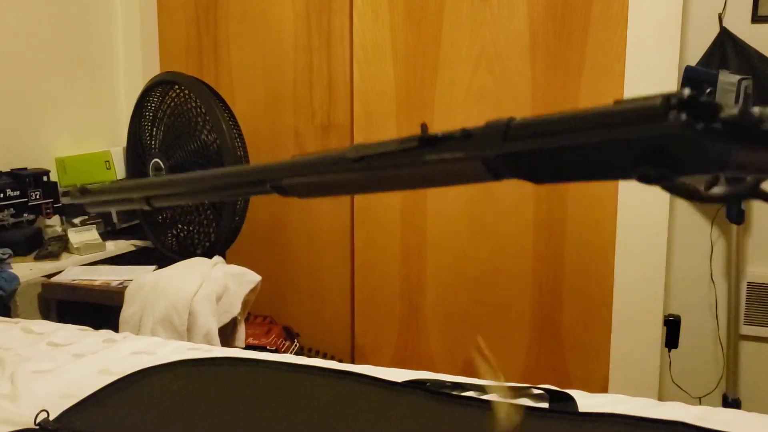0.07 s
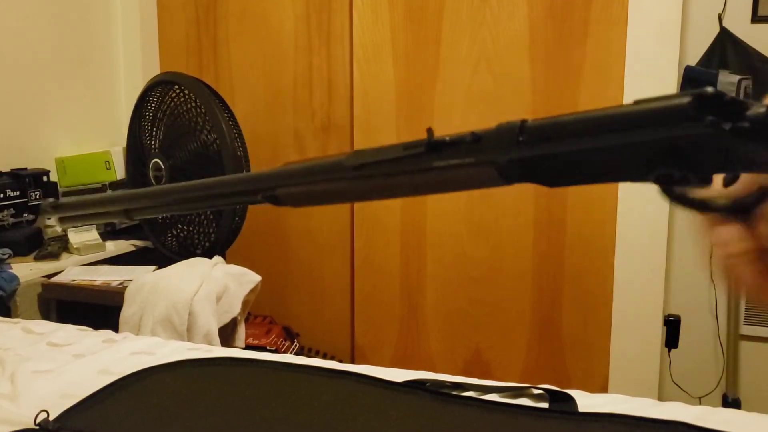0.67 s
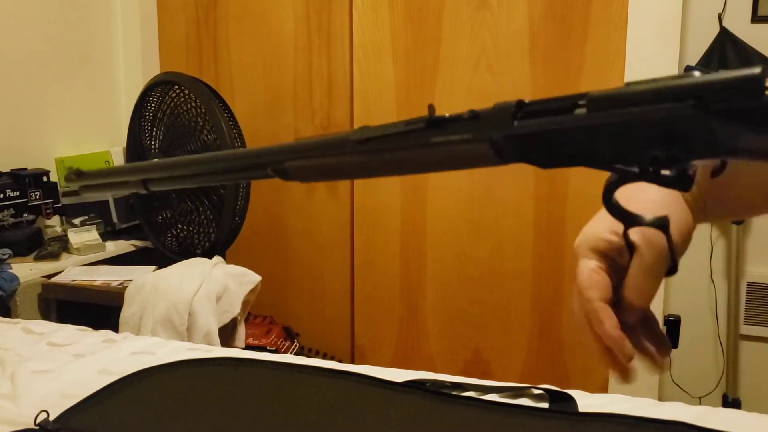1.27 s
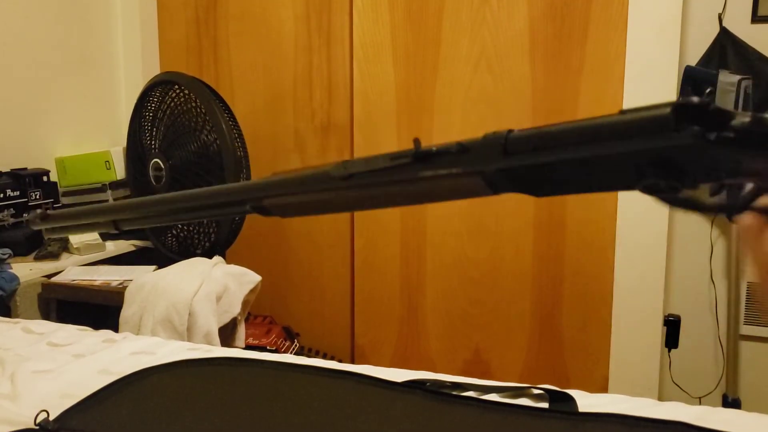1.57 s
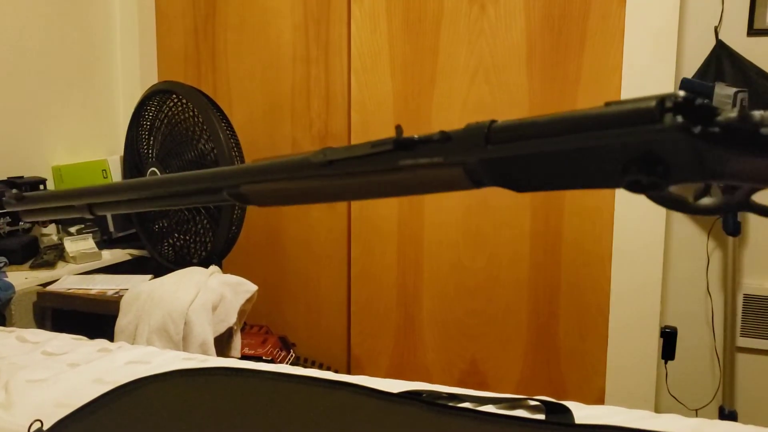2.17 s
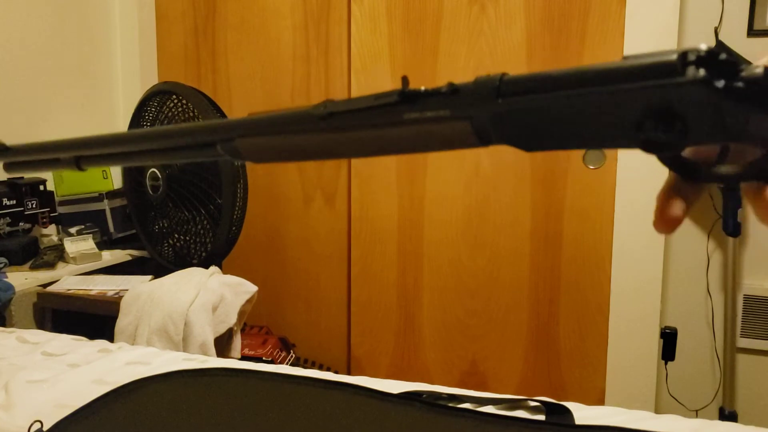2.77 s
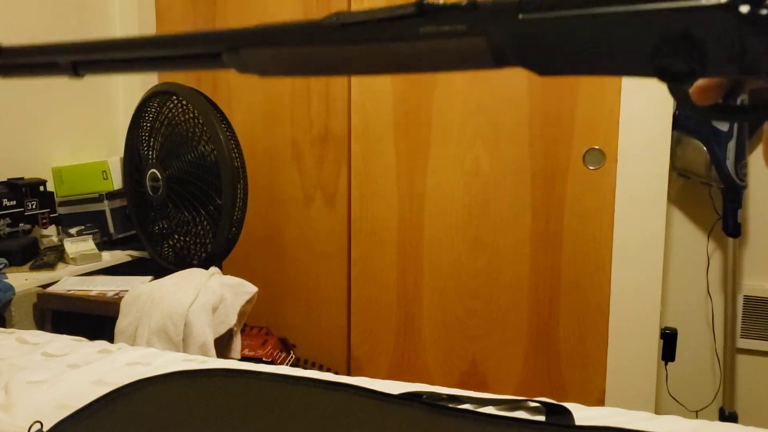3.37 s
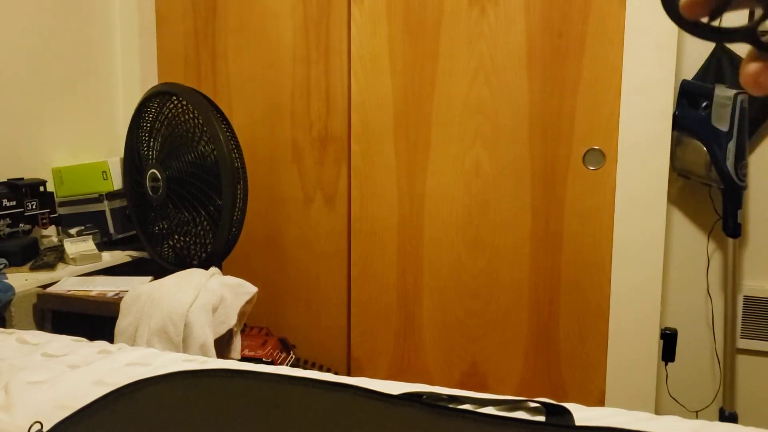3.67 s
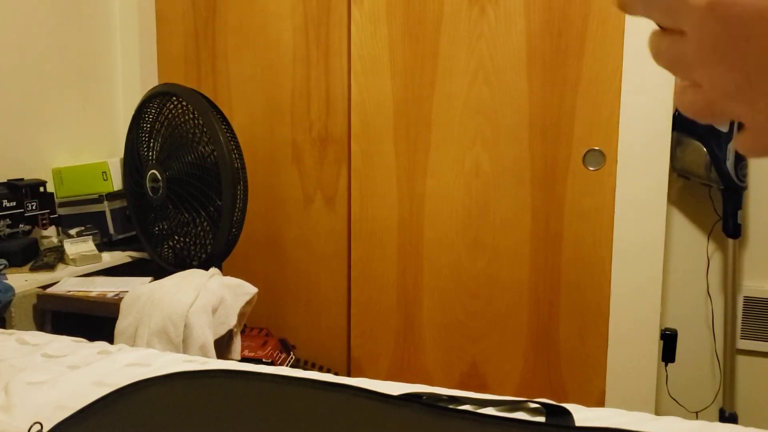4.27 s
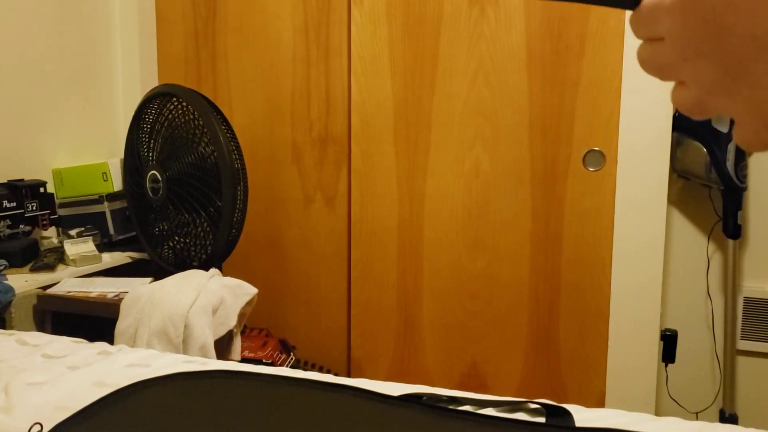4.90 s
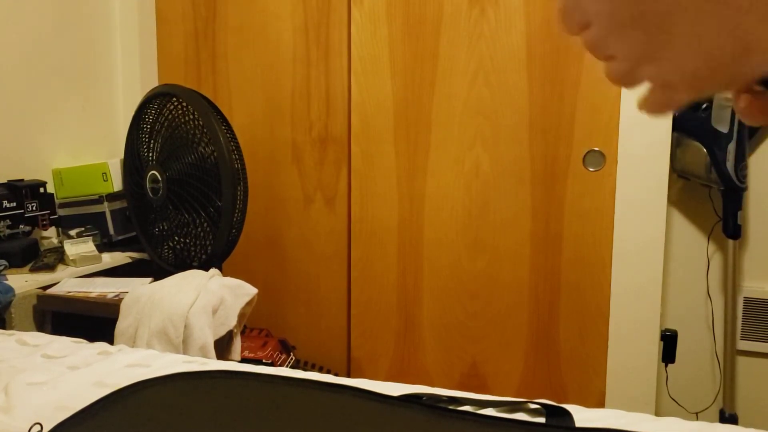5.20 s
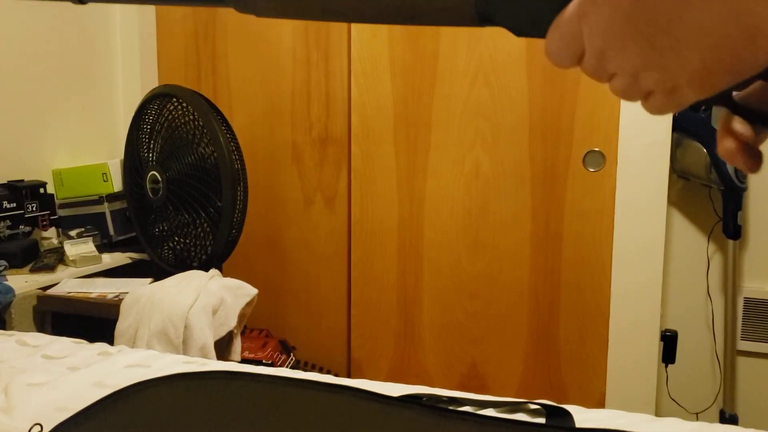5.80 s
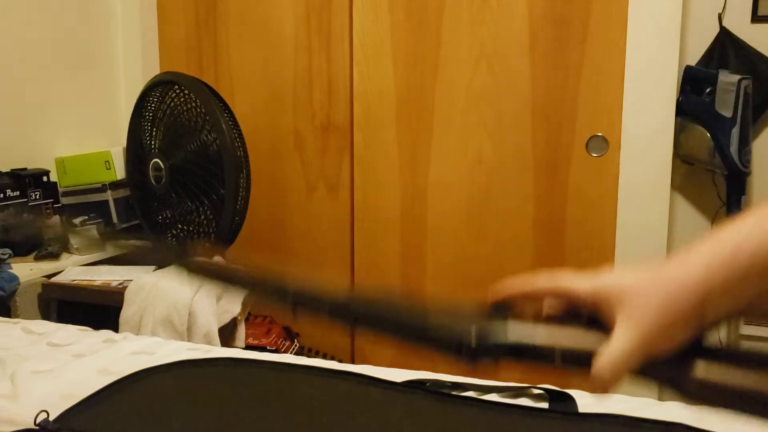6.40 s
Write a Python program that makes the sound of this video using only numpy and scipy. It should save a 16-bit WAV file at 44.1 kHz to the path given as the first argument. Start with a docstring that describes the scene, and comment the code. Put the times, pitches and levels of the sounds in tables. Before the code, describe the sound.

A toy lever-action rifle is cycled quickly with loud metallic clacks, then a few handling clicks, over a fan's steady rush.

```python
"""In a small bedroom, a toy lever-action rifle is cycled fast. Each stroke is a run of impacts that
crack, ring the steel parts and knock the receiver, with friction between them. Ejected shells thump
on the bedding. Later the hands shift and the action clicks a few times. A fan rushes and hums behind
it all, swelling as the camera's gain control recovers from the clacks."""
import sys
import numpy as np
from scipy import signal
from scipy.fft import rfft, irfft, next_fast_len
from scipy.io import wavfile
from scipy.ndimage import uniform_filter1d, minimum_filter1d, map_coordinates

SR = 44100
rng = np.random.default_rng(int(sys.argv[2]) if len(sys.argv) > 2 else 0)


def inscribe(sig):
    """Save sig as 16-bit PCM at rate SR to the path in sys.argv[1].

    A 1-D sig is mono; a 2-D sig holds one channel per row.
    Samples are clipped to [-1, 1] before scaling.
    """
    pcm = np.round(np.clip(np.atleast_2d(sig).T, -1, 1) * 32767)
    wavfile.write(sys.argv[1], SR, pcm.astype(np.int16))


N = 284445


def amp(db):
    """Decibels to gain."""
    return 10 ** (np.asarray(db) / 20)


def unit(x):
    """Scaled to rms 1."""
    return x / np.sqrt(np.mean(x ** 2) + 1e-20)


def along(points, hz):
    """Interpolation on a log frequency axis."""
    freqs, values = np.transpose(points)
    return np.interp(np.log(hz + 1), np.log(freqs + 1), values)


def wobble(rate):
    """A smooth random curve, rate knots a second."""
    return map_coordinates(rng.standard_normal(int(N * rate / SR) + 4), [np.arange(N) * rate / SR])


def filtered(x, response):
    """Linear filtering: the spectrum times a frequency response."""
    n = x.shape[-1]
    size = next_fast_len(2 * n)
    return irfft(rfft(x, size) * response(np.fft.rfftfreq(size, 1 / SR)), size)[..., :n]


def add(track, s, sound):
    """Superposition: a sound joins the track at s seconds."""
    start = max(0, round(s * SR))
    part = sound[..., :max(0, N - start)]
    track[..., start:start + part.shape[-1]] += part


def sides(pan_db):
    """Left and right gains for a level difference."""
    return unit(amp(np.array([[pan_db], [-pan_db]]) / 2))


# Each row: frequency in Hz, relative spectral density in dB.
AIR_SPECTRUM = [(15, -51.5), (25, -22.5), (48, -11), (114, -12.5), (190, -14), (249, -12), (384, -13.5),
                (427, -16), (531, -12), (754, -11), (911, -11.5), (2690, -14.5), (8830, -32),
                (14000, -29.5), (16000, -40.5)]
# Each row: frequency in Hz, correlation between the two microphones.
AIR_CORRELATION = [(60, 0.94), (150, 0.99), (380, 0.65), (950, 0.073), (2380, -0.1), (5980, 0.11),
                   (15000, -0.11)]
# Each row: frequency in Hz, level in dB, unsteadiness from 0 to 1.
FAN_TONES = [(60.7, -53, 0.7), (85.7, -51.5, 0.95), (96.6, -54.5, 1), (120.3, -47, 0.17),
             (167.8, -56.5, 0.49), (255.8, -56.5, 0.53), (427.4, -60, 0.45), (682, -59, 0.55),
             (764, -54, 0.55)]
# Each row: time in seconds, gain in dB. The fan comes up a little as the rifle is lifted away.
FAN_SWELL = [(0, -1.5), (2.95, -2), (3.3, 0.95), (6.45, -0.25)]

def fan():
    """Turbulence gives noise, coherent in the bass and diffuse above; motor and blades give tones."""
    def mid_and_side(hz):
        angle = np.arccos(np.clip(along(AIR_CORRELATION, hz), -1, 1)) / 2
        return amp(along(AIR_SPECTRUM, hz)) * [np.cos(angle), np.sin(angle)]

    mid, side = filtered(rng.standard_normal((2, N)), mid_and_side)
    air = amp(-39.5 + 0.79 * wobble(3.62)) * unit(np.array([mid + side, mid - side]))
    tones, t = np.zeros(N), np.arange(N) / SR
    for hz, db, shake in FAN_TONES:
        waver = 1 - shake + shake * (wobble(14) + 1j * wobble(14))
        tones += amp(db) * unit(np.real(waver * np.exp(2j * np.pi * hz * t)))
    return (air + tones) * sides(2.27) * amp(np.interp(t, *np.transpose(FAN_SWELL)))


# Each row: frequency in Hz, reverberation time T60 in seconds.
ROOM_DECAY = [(200, 0.4), (1300, 0.18), (3500, 0.27), (9000, 0.18), (15000, 0.17)]

def in_room(near, far, build_s=.0045, wall_s=0.011, wall_db=3.5):
    """Reverberation: direct sound is followed by a cluster of wall echoes and a diffuse tail."""
    hz, t, spectra = signal.stft(rng.standard_normal((2, SR // 3)), SR, nperseg=256)
    tail = signal.istft(spectra * amp(-60 * t / along(ROOM_DECAY, hz)[:, None]), SR, nperseg=256)[1]
    t = np.arange(tail.shape[1]) / SR
    tail *= 1 - np.exp(-(t / build_s) ** 2)
    tail *= amp(wall_db * np.exp(-((t - wall_s) / 0.0055) ** 2))
    heard = signal.fftconvolve(far, tail / np.linalg.norm(tail[0]), axes=1)
    heard[:, :near.shape[1]] += near
    return heard


def burst(t, attack, t60):
    """Impulsive excitation: decaying noise of energy 1, different at each microphone."""
    noise = rng.standard_normal((2, len(t))) * (1 - np.exp(-(t / attack) ** 2)) * amp(-60 * t / t60)
    return noise / np.linalg.norm(noise, axis=1, keepdims=True)


# Each row: frequency in Hz, relative level in dB, T60 in seconds.
STEEL_MODES = [(9750, -1, 0.025), (10830, -8.5, 0.033), (11400, -3, 0.033), (11840, -5, 0.053),
               (12700, -16, 0.031), (13100, -2, 0.043), (12940, -2.5, .04), (12900, -8.5, 0.035),
               (14600, -2.5, .04), (15100, -4, .03)]

def steel_ring(t):
    """Free vibration: small parts ring at random strengths, slightly off pitch as the linkage moves."""
    ring = np.zeros((2, len(t)))
    detunes = 1 + .003 * rng.standard_normal(len(STEEL_MODES))
    for (hz, db, t60), detune in zip(STEEL_MODES, detunes):
        envelope = amp(db + rng.normal(0, 2.5, (2, 1)) - 60 * t / t60)
        ring += envelope * np.sin(2 * np.pi * (hz * detune * t + rng.random((2, 1))))
    return ring


# Each row: centre frequency in Hz, bandwidth in Hz, gain in dB.
RECEIVER_MODES = [(747, 110, -3), (1396, 120, 3), (1530, 130, 2), (1705, 72, 1.5), (1822, 65, -0.5),
                  (2065, 137, -1), (2386, 170, -1), (3500, 1600, -7.5)]

def receiver(hz):
    """Resonance: the receiver responds as a sum of damped modes of alternating sign."""
    return sum((-1) ** k * amp(db) * 1j * hz * width / (centre ** 2 - hz ** 2 + 1j * hz * width)
               for k, (centre, width, db) in enumerate(RECEIVER_MODES))


# Each row: frequency in Hz, relative spectral density in dB.
METAL_SPECTRUM = [(1180, -22.5), (2000, -12), (3260, -12.5), (5440, -8), (6250, -7.5), (8850, -7.5),
                  (9330, -6), (10200, -7.5), (11300, 0.5), (12400, -2), (13600, 0), (15200, -3.5),
                  (16000, -11)]

def contact(metal_db, knock_db, pan_db, room_db):
    """A brief impact excites a wide band: a crack, ringing steel and a knock in the receiver."""
    t = np.arange(SR // 10) / SR
    crack = filtered(burst(t, attack=.0008, t60=.011), lambda hz: amp(along(METAL_SPECTRUM, hz)))
    metal = amp(metal_db - 15) * (unit(crack) + amp(-10) * unit(steel_ring(t)))
    mid, side = filtered(burst(t, attack=0.00048, t60=0.0052), receiver)
    knock = amp(knock_db - 12.5) * unit(mid + amp(-4) * np.array([side, -side]))
    near = metal * sides(pan_db + 2) + knock
    far = amp(room_db - 1) * (metal * sides(-0.42) + knock)
    return in_room(near, far)


# Each row: frequency in Hz, left-right difference in dB.
DIRECTION_COLOUR = [(700, 1), (1300, -1.5), (2400, 5), (4400, 4.5), (8100, -1), (12500, -3)]

def contacts(table, level_db, bright_db):
    """Acoustic shadowing colours the impacts differently on each side; lighter parts sound brighter."""
    track = np.zeros((2, N))
    for s, *strike in table:
        add(track, s, amp(level_db) * contact(*strike))
    shelf = [(9500, -bright_db / 2), (12000, bright_db / 2)]
    split = np.array([[0.5], [-0.5]])
    return filtered(track, lambda hz: amp(along(shelf, hz) + split * along(DIRECTION_COLOUR, hz)))


def blow(s, db, kind):
    """Linear scaling: a blow's strength raises metal and knock alike."""
    metal_db, knock_db, pan_db, room_db = kind
    return s, metal_db + db, knock_db + db, pan_db, room_db


# Each kind of hit lists metal level, knock level, left-right difference and room gain, all in dB.
CATCH_HIT = (-23, -40.5, -7, -1)
LIFT_HIT = (-19, -35, -11, 2)
FEED_HIT = (-17, -43, -10, 1.5)
# Each row: start in seconds, strength in dB, feed delay in seconds, feed strength in dB.
CARRIER_LIFTS = [(.0144, 1.5, 0.012, 0), (.494, 1.5, 0.012, 0.5), (.9398, -1.5, .0204, 1.5),
                 (1.4073, -2, .0224, 1), (1.8763, 0, .018, -1)]

def carrier(lead_s=.008):
    """Successive impacts begin the closing stroke: the carrier catches, lifts and feeds a shell."""
    run = []
    for s, db, feed_s, feed_db in CARRIER_LIFTS:
        run += [blow(s - lead_s, db, CATCH_HIT), blow(s, db, LIFT_HIT),
                blow(s + feed_s, feed_db, FEED_HIT)]
    return run


def scrapes(release_s=0.0077):
    """Stick-slip friction grows in the receiver until each part breaks free."""
    t = np.arange(N) / SR
    # Each row: steps, rise time in seconds, level in dB.
    steps = [(CARRIER_LIFTS, .013, -28.5), (LEVER_UNLATCHES, .018, -33), (REAR_STOPS, .03, -29)]
    force = sum(amp(db + scrape_db) * np.exp(-np.maximum((s - t) / rise_s, (t - s) / release_s))
                for table, rise_s, scrape_db in steps for s, db, *_ in table)
    grit = rng.standard_normal((2, N)) * amp(6.2 * wobble(210))
    return force * unit(filtered(grit, receiver))


def knocks(table, modes):
    """Modal vibration: a heavy blow rings one part as a sum of damped sines."""
    track, t = np.zeros((2, N)), np.arange(SR // 10) / SR
    for s, level_db in table:
        thud = sides(1) * sum(amp(level_db + db + 3 + rng.normal(0, 2.5) - 60 * t / t60)
                              * np.sin(2 * np.pi * hz * t) for hz, db, t60 in modes)
        add(track, s, in_room(thud, amp(-6) * thud))
    return track


# Each row: frequency in Hz, relative level in dB, T60 in seconds.
BOLT_MODES = [(1550, -4, 0.046), (1667, 3, .04), (1810, -2, 0.054)]

def bolt_ring(lift_db=-30.5):
    """Impact excitation: lifting and locking set the bolt's modes ringing."""
    lifts = [(s, db + lift_db) for s, db, *_ in CARRIER_LIFTS]
    locks = [(s, ring_db) for s, _, ring_db, _ in BOLT_LOCKS]
    return knocks(lifts + locks, BOLT_MODES)


# Each hit: metal, knock, left-right difference and room, in dB.
LOCK_HIT = (-13, -32, -5.5, -1)
BOUNCE_HIT = (-21, -32.5, -5, 2)
# Each row: start in seconds, then strengths of lock, bolt ring and bounce in dB.
BOLT_LOCKS = [(0.0714, -0.5, -32, -0.5), (0.5552, -2, -34, 0), (1.0048, 0.5, -19.5, 1.5),
              (1.4811, -0.5, -23, -22), (1.9431, -3, -22.5, -9)]

def locking(bounce_s=.0138):
    """Elastic rebound: the bolt locks, bounces and strikes again."""
    run = []
    for s, db, _, bounce_db in BOLT_LOCKS:
        run += [blow(s, db, LOCK_HIT), blow(s + bounce_s, bounce_db, BOUNCE_HIT)]
    return run


# The hit: metal, knock, left-right difference and room, in dB.
SLAM_HIT = (-14, -28.5, -4, -1)
# Each row: start in seconds, strength in dB, stock level in dB.
LEVER_SLAMS = [(.1005, -1, -24.5), (0.5843, 1.5, -21.5), (1.0343, -4.5, -25.5), (1.51, 1.5, -29),
               (1.9696, 1, -28)]

def slamming():
    """Sudden deceleration: the lever ends the closing stroke against the stock."""
    return [blow(s, db, SLAM_HIT) for s, db, _ in LEVER_SLAMS]


# Each row: frequency in Hz, relative level in dB, T60 in seconds.
STOCK_MODES = [(507, -11, 0.02), (782, -2.5, 0.046), (905, -7, 0.027), (1200, -9, 0.015)]

def stock_thuds():
    """Damped resonance: the stock answers each slam briefly."""
    return knocks([(s, stock_db) for s, _, stock_db in LEVER_SLAMS], STOCK_MODES)


# Each row: loudest moment in seconds, half length in seconds, level in dB.
RUB_STROKES = [(.14, 0.081, -29), (.69, 0.19, -31.5), (.91, .06, -37), (1.64, .04, -44),
               (2.73, 0.29, -50.5), (3.62, 0.1, -46), (5.25, 0.32, -58)]

def sliding():
    """Sliding friction: metal and hands rub along the action with a fine, uneven hiss."""
    t = np.arange(N) / SR
    pressure = sum(amp(db) * np.exp(-((t - s) / half) ** 2) for s, half, db in RUB_STROKES)
    hiss = unit(filtered(rng.standard_normal((2, N)), lambda hz: amp(along(METAL_SPECTRUM, hz))))
    grain = amp(1.8 * wobble(150))
    return hiss * grain * pressure * sides(-4.5)


# Each row: start in seconds, relative level in dB, pitch in Hz.
SHELL_LANDINGS = [(0.243, -47, 185), (0.771, -41.5, 104), (1.191, -35, 146), (1.681, -36.5, 147)]

def shells(attack_s=0.00038, t60=0.096):
    """Heavy damping: each shell gives the mattress only a short, dull thump."""
    track, t = np.zeros(N), np.arange(SR // 4) / SR
    for s, db, hz in SHELL_LANDINGS:
        phase = 2 * np.pi * hz * t
        thump = np.sin(phase) + amp(-10.5) * np.sin(1.26 * phase) + amp(-15) * np.sin(.4 * phase)
        add(track, s, amp(db + 14 - 60 * t / t60) * (1 - np.exp(-t / attack_s)) * thump)
    return track


# The hit: metal, knock, left-right difference and room, in dB.
TICK_HIT = (-32, -43.5, -3, 0.5)

def rattle(count=2, lead_s=.05, rise_db=12, scatter_db=3):
    """Mechanical play: loose parts tick at random, louder as the opening lever nears each step."""
    run = []
    for s, db, *_ in LEVER_UNLATCHES + REAR_STOPS:
        for early in (np.arange(count) + rng.random(count)) / count:
            tick_db = db - rise_db * early + rng.normal(0, scatter_db)
            run.append(blow(s - lead_s * early, tick_db, TICK_HIT))
    return run


# Each hit: metal, knock, left-right difference and room, in dB.
UNLATCH_HIT = (-27, -35, -7.5, 1)
STOP_HIT = (-15.5, -33, -6.5, -0.5)
REBOUND_HIT = (-16, -44, -8.5, -3)
SETTLE_HIT = (-17, -41.5, -11, 3.5)
# Each row: start in seconds, strength in dB.
LEVER_UNLATCHES = [(.2807, 2), (.7465, -6), (1.1831, -2.5), (1.6332, -4)]
# Each row: start in seconds, strength in dB, rebound strength in dB, settling delay in seconds.
REAR_STOPS = [(.3064, 0.5, 2, .0275), (0.7682, 1, 0, 0.027), (1.2307, -0.5, -1, .0254),
              (1.6932, -4.5, 0, 0.021)]

def opening(rebound_s=.0103):
    """Collision and rebound: the lever unlatches; the bolt hits its rear stop, bounces and settles."""
    run = [blow(s, db, UNLATCH_HIT) for s, db in LEVER_UNLATCHES]
    for s, db, rebound_db, settle_s in REAR_STOPS:
        run += [blow(s, db, STOP_HIT), blow(s + rebound_s, rebound_db, REBOUND_HIT),
                blow(s + settle_s, 0, SETTLE_HIT)]
    return run


# Each row: start in seconds, then metal, knock, left-right difference and room in dB.
HANDLING_CLICKS = [(3.189, -51, -47.5, 0, 9), (3.66, -41.5, -54, -5, 11.5), (5.3951, -30.5, -56, -7, -4),
                   (5.6465, -24.5, -39, -12, 2), (5.6497, -14.5, -36, -4, 1)]

def handling():
    """Light impacts: the action clicks brightly as the hands shift."""
    return contacts(HANDLING_CLICKS, level_db=0.5, bright_db=2.5)


def scene():
    """Superposition: the fan, the rifle and its shells add in the air."""
    cycling = carrier() + locking() + slamming() + rattle() + opening()
    clacks = contacts(cycling, level_db=9.5, bright_db=0.5)
    return fan() + clacks + scrapes() + bolt_ring() + stock_thuds() + sliding() + shells() + handling()


def gain_control(x, threshold_db, range_db, hold_s, release_db_per_s):
    """Compression: loud sound cuts the gain at once, within a range; it holds, then recovers."""
    level = np.sqrt(np.abs(uniform_filter1d(np.mean(x ** 2, axis=0), size=1764)))  # rms over 40 ms
    cut_db = np.minimum(20 * np.log10(np.maximum(level / amp(threshold_db), 1)), range_db)
    span = 2 * int(hold_s * SR / 2) + 1
    held_db = -minimum_filter1d(-cut_db, span, origin=span // 2, mode="nearest")
    release_db = release_db_per_s * np.arange(N) / SR
    return x / amp(np.maximum.accumulate(held_db + release_db) - release_db)


def record(dry, ceiling=.75, top_hz=15900):
    """The camera applies gain control, soft saturation and a band limit."""
    steady = gain_control(dry, threshold_db=-24, range_db=10, hold_s=2.11, release_db_per_s=11)
    rounded = steady / (1 + (steady / ceiling) ** 4) ** .25
    return filtered(rounded, lambda hz: hz < top_hz)


dry = scene()
out = record(dry)
inscribe(out)
```